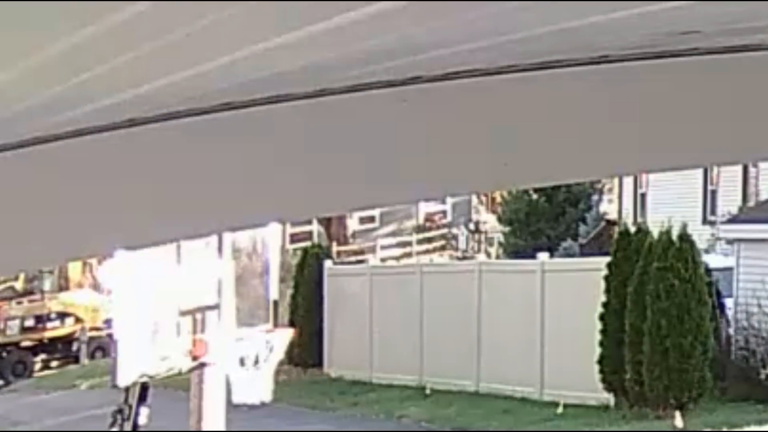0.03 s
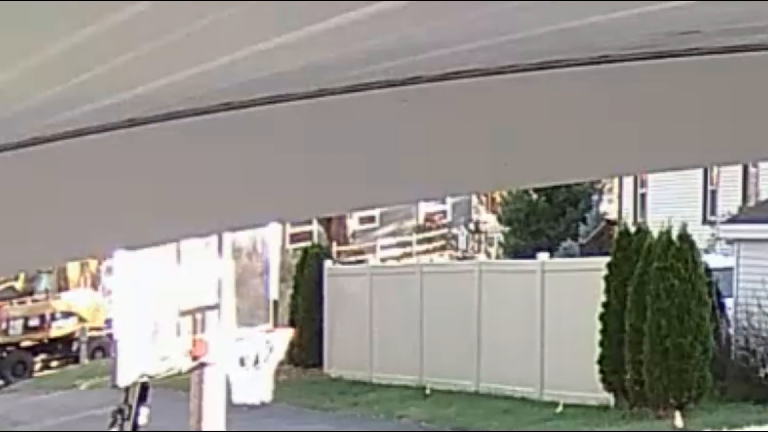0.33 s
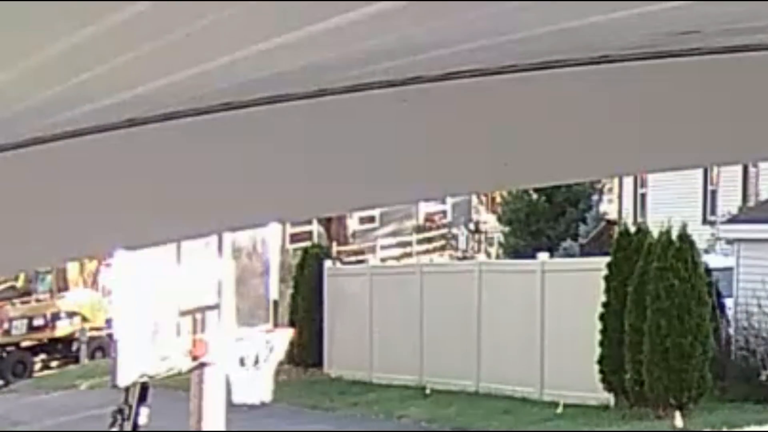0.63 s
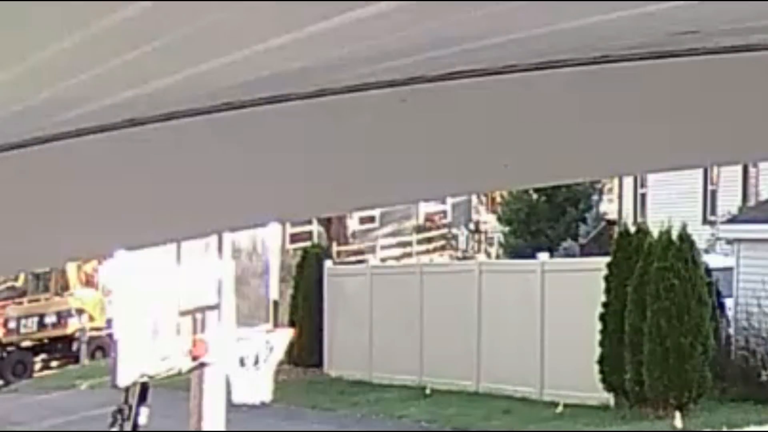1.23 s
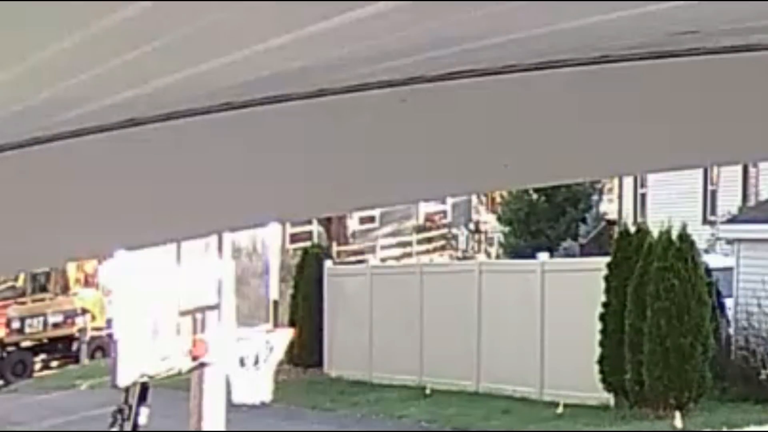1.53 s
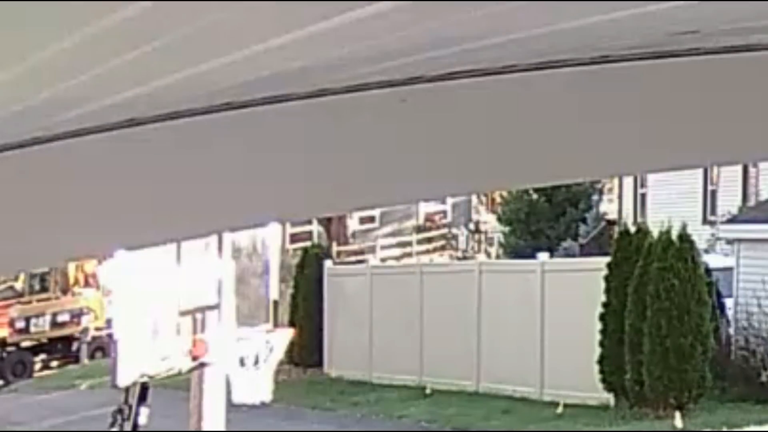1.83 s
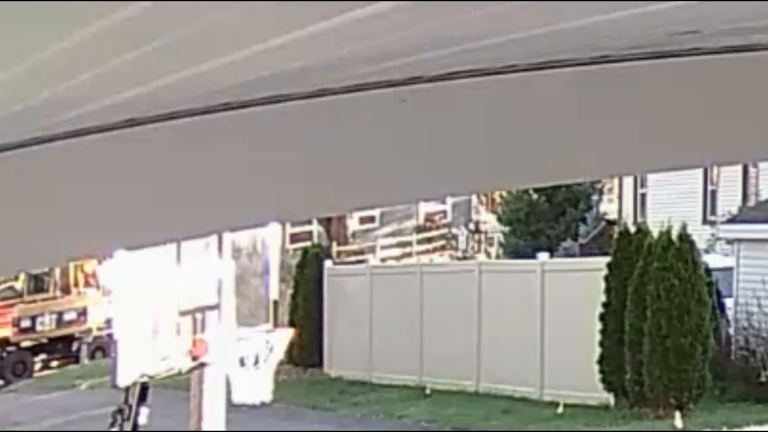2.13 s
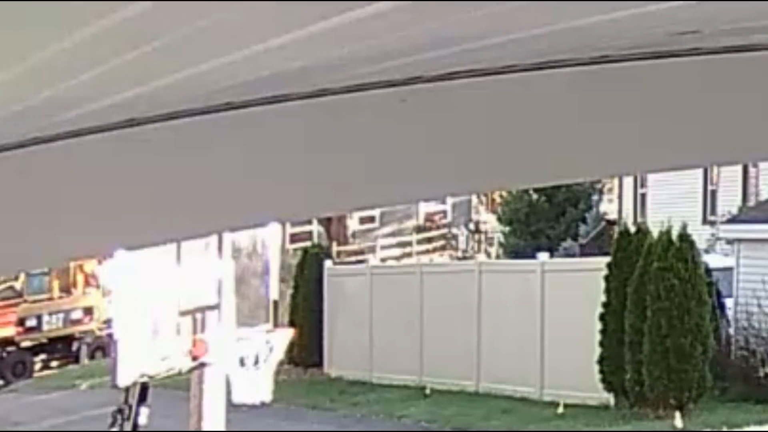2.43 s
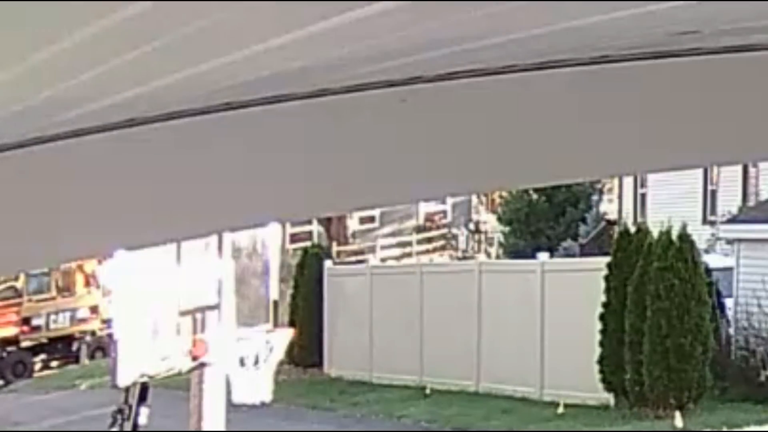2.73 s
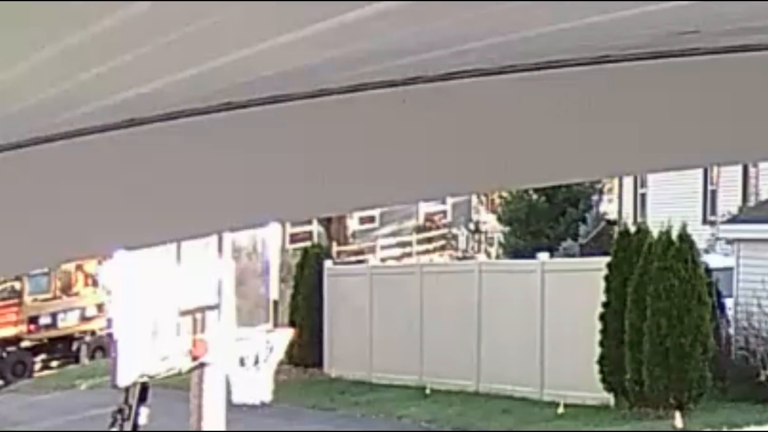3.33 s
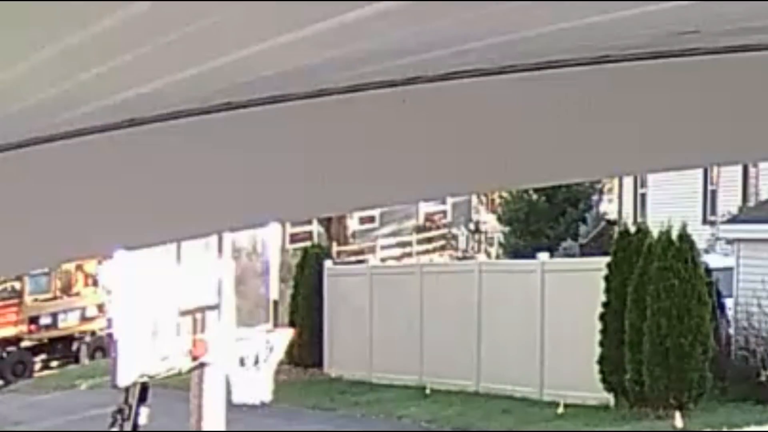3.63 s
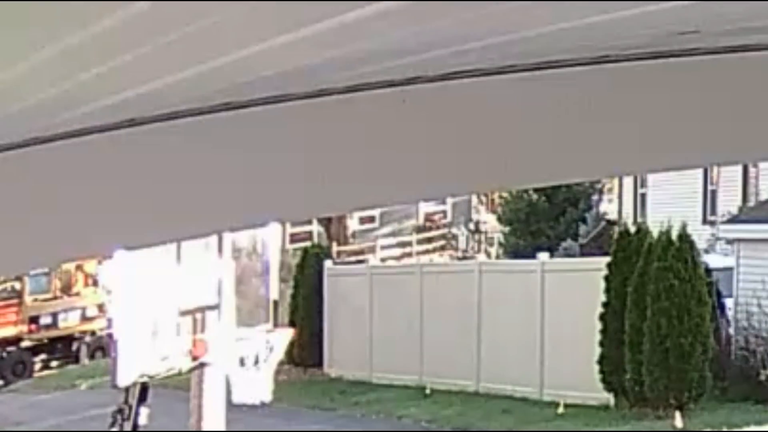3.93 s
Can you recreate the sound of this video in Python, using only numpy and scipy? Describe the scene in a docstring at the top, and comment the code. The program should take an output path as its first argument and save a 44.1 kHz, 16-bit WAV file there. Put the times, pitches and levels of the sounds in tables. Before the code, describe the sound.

Diesel machinery runs across the street for all 4 seconds, a deep throb with exhaust rumble and a steady roar. Faint gear tones come and go and a fan hum creeps upward. A thin high whine sinks from about 1 second and fades by 2.5. Near 2.9 seconds steel knocks and bounces in one clank. The camera microphone under the eaves sounds narrow and adds thin hiss.

```python
"""Under the eaves of a house, a narrow-band camera microphone hears diesel machinery across the street.
One engine idles with a deep throb; a second fires faster and beats against it, over exhaust rumble
and a steady mechanical roar. Gear tones come and go, a high whine sinks and a fan hum rises.
Steel knocks and bounces in one clank. The camera adds a thin hiss on top."""
import sys
import numpy as np
from scipy import signal
from scipy.fft import rfft, irfft
from scipy.io import wavfile
from scipy.ndimage import uniform_filter1d, map_coordinates

SR = 44100
rng = np.random.default_rng(int(sys.argv[2]) if len(sys.argv) > 2 else 0)


def materialize(psi):
    """Save the field psi as 16-bit PCM at rate SR to the path in sys.argv[1].

    A 1-D psi becomes a single channel; in a 2-D psi each row is a channel.
    """
    bounded = np.clip(np.atleast_2d(psi).T, -1, 1)
    quanta = np.round(bounded * 32767).astype(np.int16)
    wavfile.write(sys.argv[1], SR, quanta)


N = 176400

# spectrum of the machinery's roar and of the clank's crack (frequency [Hz], relative level [dB])
ROAR_SPECTRUM = [(200, -7.5), (500, -2), (750, 1.5), (1000, -1), (1300, -0.5), (1650, -0.5), (1980, -1),
                 (2150, -6), (2450, -8), (2750, -2), (3100, -0.5), (3280, -3), (3450, -9), (3750, -10.5),
                 (3920, -25.5), (4150, -33), (4500, -55), (5000, -66.5)]


def idling_engine(firing):
    """Slow, even firings: a deep throb with few overtones, each a little unsteady in level."""
    # exhaust harmonics (multiple of the firing rate, level [dB])
    orders = [(1, -22.5), (2, -32), (3, -43.5)]
    flutter_db = 0.7
    return np.sqrt(2) * sum(undb(db + flutter_db * walk(9.5)) * np.sin(k * firing) for k, db in orders)


def working_engine(firing):
    """An exhaust note fades under its octave and returns; unequal cylinders add wavering half orders."""
    # exhaust note (time [s], level [dB])
    note_level = [(0, -22.5), (.5, -28), (1.1, -25.5), (1.8, -29.5), (2.4, -30), (3, -36), (3.5, -29.5),
                  (4, -25.5)]
    # octave above it (time [s], level [dB])
    octave_level = [(0, -37), (1.5, -44), (2.25, -35), (2.7, -37), (3.2, -35.5), (4, -39.5)]
    # tones of the unequal cylinders (multiple of the firing rate, level [dB])
    half_orders = [(1.5, -41.5), (3.5, -42.5), (4.5, -45.5)]
    flutter_db, drone_hz, drone_db = 0.5, 174.3, -45.5
    out = undb(curve(note_level)) * np.sin(firing) + undb(curve(octave_level)) * np.sin(2 * firing)
    for k, db in half_orders:
        out += undb(db + flutter_db * walk(3.5)) * np.sin(k * firing + 2 * np.pi * rng.random())
    drone = undb(drone_db) * np.sin(turn(drone_hz))  # a steady machine tone beside the engine
    return np.sqrt(2) * (out + drone)


def exhaust_rumble(idle_firing, work_firing):
    """Turbulent exhaust gas, puffing with the firings of both engines."""
    # gas noise (frequency [Hz], relative level [dB])
    spectrum = [(5, 0.5), (14, 6.5), (24, 7.5), (45, 0), (78, 2), (110, 0.5), (140, 0.5), (190, -5.5),
                (245, -3.5), (320, -11.5), (450, -15.5), (700, -25), (1200, -58)]
    # its loudness (time [s], level [dB])
    level = [(0, -29), (.7, -30), (1.3, -29.5), (2.2, -29), (2.6, -28), (3, -27.5), (3.5, -27.5),
             (4, -32.5)]
    puffs = 1 + 0.19 * (np.cos(idle_firing) + np.cos(work_firing))
    return colour(noise() * puffs, spectrum) * undb(curve(level))


def roar(firing):
    """Combustion clatter and fan noise with a slight rattle, heard directly and off walls and eaves."""
    # roar straight across the street (time [s], level [dB])
    level = [(0, -36), (1.2, -36.5), (2.3, -36), (3.1, -35.5), (4, -37)]
    # reflections at the microphone (delay [s], gain [dB])
    reflections = [(0.0124, -16), (0.0206, -15.5), (0.034, -18.5)]
    rattle_hz, swell_db = 17.1, 0.54
    rattle = np.cos(turn(rattle_hz * (1 + .03 * walk(1.7))))
    pulsing = 1 + 0.047 * np.cos(firing) + 0.027 * rattle
    direct = colour(noise() * pulsing, ROAR_SPECTRUM) * undb(curve(level) + swell_db * walk(6.24))
    return direct + sum(undb(db) * np.roll(direct, int(delay * SR)) for delay, db in reflections)


def growl():
    """A low band of mechanical noise under the roar."""
    # machine noise (frequency [Hz], relative level [dB])
    spectrum = [(150, -22), (260, -2.5), (340, -1), (430, 3), (520, 1), (700, -11), (1200, -22.5),
                (3000, -52.5)]
    # its loudness (time [s], level [dB])
    level = [(0, -39.5), (.9, -40.5), (1.7, -38.5), (2.4, -43), (2.75, -38), (2.97, -38), (3.15, -39.5),
             (3.6, -39.5), (4, -37)]
    return colour(noise(), spectrum) * undb(curve(level))


def gear_whine(firing):
    """Gear tones locked to the working engine's speed; now one, now another swells up."""
    # gear tones (start [s], length [s], multiple of the firing rate, level [dB])
    swells = [(0, 0.69, 25, -45.5), (0.129, 0.38, 27, -46.5), (.47, .25, 27, -41.5), (.58, 0.19, 26, -49.5),
              (1.04, 0.4, 27, -47.5), (1.46, 0.99, 27, -46), (1.5, .42, 23, -49), (1.506, 0.25, 24, -48),
              (1.299, 0.58, 26, -52), (1.724, .36, 25, -47.5), (3.12, 0.44, 27, -47.5),
              (3.498, .42, 26, -46.5), (3.477, .36, 25, -45.5)]
    fade_s, flutter_db = .078, 1.5
    t, out = times(), np.zeros(N)
    for start, length, k, db in swells:
        fade = np.clip(np.minimum(t - start, start + length - t) / fade_s, 0, 1)
        out += np.sqrt(2) * fade * undb(db + flutter_db * walk(25)) * np.sin(k * firing)
    return out


def cooling_fan():
    """The hum of the blades creeps up as the fan gathers speed."""
    # blade tone (time [s], blade rate [Hz], level [dB])
    hum = [(0, 182, -50.5), (.65, 185, -37.5), (1.25, 187.5, -39.5), (2, 193, -44), (2.6, 195.5, -42.5),
           (3, 199, -43), (3.35, 200, -37.5), (4, 200, -48)]
    return glide(hum)


def turbo_whine():
    """A thin, fluttering whine, probably the turbocharger, lifts slightly and then runs down."""
    # rotor tone (time [s], pitch [Hz], level [dB])
    whine = [(0, 1912, -48), (.2, 1918, -42), (.35, 1928, -53.5), (.75, 1950, -43.5), (1, 1941, -44.5),
             (1.12, 1930, -51), (1.32, 1885, -46), (1.5, 1872, -55.5), (1.88, 1830, -51), (2.07, 1820, -44),
             (2.25, 1814, -51.5), (2.6, 1804, -67.5)]
    return glide(whine, waver=.0015 * walk(70)) * undb(walk(25))


def clank():
    """Steel knocks and bounces in one clank, cracking and ringing, and the heavy body thumps twice."""
    # sharp onsets (time [s], gain [dB], brightness [dB/octave])
    # the first and last rows are two faint, bright ticks; the rows between make the clank
    onsets = [(1.975, -13, 3), (2.867, 0, -3.5), (2.8703, -3, 5.5), (2.881, -1, -3.5), (2.886, -7, 1),
              (2.903, -9.5, 0), (2.919, -13.5, 5), (3.303, -11.5, 4)]
    # ringing after each onset (frequency [Hz], relative level [dB], t60 [s])
    high_modes = [(1195, -34.5, 0.079), (1301, -35, 0.074), (1330, -34, .05), (1560, -36.5, .05),
                  (1630, -36, 0.057), (2363, -38.5, 0.1), (2780, -33.5, 0.033), (3080, -29, .035),
                  (3240, -28.5, .04), (3710, -34, 0.026)]
    # thumps of the body (time [s], gain [dB])
    thumps = [(2.873, -25.5), (2.89, -23.5)]
    # ringing of the body (frequency [Hz], relative level [dB], t60 [s])
    body_modes = [(140, -8, 0.19), (228, 1, 0.18), (258, -6, 0.14), (290.5, -3, 0.15), (337, -7.5, 0.091)]
    attack_s, crack_decay_s, thump_rise_s = 0.00048, 0.0087, 0.0047
    t, out = times(), np.zeros(N)
    for start, db, brightness in onsets:
        age = np.maximum(t - start, 0)
        crack = undb(-32.5) * np.exp(-age / crack_decay_s) * colour(noise(), ROAR_SPECTRUM)
        out += undb(db) * (1 - np.exp(-age / attack_s)) * (ring(high_modes, age, brightness) + crack)
    for start, db in thumps:
        age = np.maximum(t - start, 0)
        out += undb(db) * (1 - np.exp(-age / thump_rise_s)) * ring(body_modes, age)
    return out


def steel_whir():
    """Shaken steel parts ring faintly in narrow bands that swell and fade."""
    # resonances of the parts (frequency [Hz], width [Hz], level [dB])
    bands = [(1185, 34, -61.5), (1307, 48, -56.5), (1595, 17, -58), (1970, 53, -51.5), (2138, 13, -59),
             (3000, 42, -55.5), (3103, 50, -53.5), (3214, 22, -53.5)]
    flutter_db = 2
    return sum(undb(db + flutter_db * walk(6.8)) * resonance(hz, width) for hz, width, db in bands)


def ring(modes, age, tilt_db=0, pivot_hz=2000):
    """Decaying modes, tilted brighter or duller in dB per octave."""
    out = np.zeros(N)
    for hz, db, t60 in modes:
        envelope = undb(db + tilt_db * np.log2(hz / pivot_hz) - 60 * age / t60)
        out += envelope * np.sin(2 * np.pi * (hz * age + rng.random()))
    return np.sqrt(2) * out


def glide(rows, waver=0):
    """A tone along (time [s], pitch [Hz], level [dB]) rows, its pitch wavering by the given share."""
    rows = np.array(rows)
    hz, db = curve(rows[:, :2]), curve(rows[:, ::2])
    return np.sqrt(2) * undb(db) * np.sin(turn(hz * (1 + waver)))


def resonance(hz, width):
    """Noise ringing in one resonance; rms 1."""
    f = np.fft.rfftfreq(N, 1 / SR)
    return unit(irfft(rfft(noise()) / (1 + (2 * (f - hz) / width) ** 2), N))


def colour(x, spectrum):
    """Filter by (frequency [Hz], relative level [dB]) rows; rms 1."""
    hz, db = np.array(spectrum).T
    f = np.maximum(np.fft.rfftfreq(N, 1 / SR), 1)
    gain = undb(np.interp(np.log(f), np.log(hz), db))
    return unit(irfft(rfft(x) * gain, N))


def walk(rate_hz):
    """Smooth random drift; rms 1."""
    step = int(SR / rate_hz)
    held = np.repeat(rng.standard_normal(400), step)[:N + 2 * step]
    smooth = uniform_filter1d(uniform_filter1d(held, step), step)
    return unit(np.resize(smooth[step:], N))


def turn(hz):
    """Running phase in radians of a rate, from a random start."""
    return 2 * np.pi * (np.cumsum(hz * np.ones(N)) / SR + rng.random())


def curve(rows):
    """Straight lines through (time [s], value) rows."""
    return np.interp(times(), *np.array(rows).T)


def times():
    """Seconds at each sample."""
    return np.arange(N) / SR


def noise():
    """White noise."""
    return rng.standard_normal(N)


def undb(db):
    """Decibels to gain."""
    return 10 ** (np.asarray(db) / 20)


def unit(x):
    """Scale to rms 1."""
    return x / np.sqrt(np.mean(x ** 2))


def scene():
    """The machinery as heard from across the street, in mono; two firing phases drive the engines."""
    # speed of the working engine (time [s], firing rate [Hz])
    work_speed = [(0, 61.3), (.25, 61.55), (.6, 62.0), (1, 62.6), (1.28, 62.95), (1.6, 62.3), (1.95, 62.75),
                  (2.25, 63.15), (2.7, 63.3), (3.3, 62.75), (3.6, 61.9), (4, 62.2)]
    idle_hz = 35.1
    idle_firing = turn(idle_hz * (1 + 0.0038 * walk(2.8)))
    work_firing = turn(curve(work_speed))
    engines = idling_engine(idle_firing) + working_engine(work_firing)
    din = exhaust_rumble(idle_firing, work_firing) + roar(work_firing) + growl()
    whines = gear_whine(work_firing) + turbo_whine() + cooling_fan()
    return (engines + din + whines + steel_whir() + clank())[None]


def record(dry):
    """The camera joins narrow-band, low-rate samples by straight lines, mirroring the sound into the treble,
    and adds a faint hiss."""
    mic_top_hz, camera_rate_hz, output_top_hz, self_noise_db = 4150, 16000, 15800, -88.5
    mic_lowpass = signal.ellip(8, .2, 70, mic_top_hz, fs=SR, output="sos")
    output_lowpass = signal.ellip(8, .2, 70, output_top_hz, fs=SR, output="sos")
    narrow = signal.sosfilt(mic_lowpass, np.pad(dry[0], (0, 64), mode="edge"))
    positions = np.arange(0, len(narrow), SR / camera_rate_hz)
    samples = map_coordinates(narrow, [positions], order=5, mode="nearest")
    joined = np.interp(np.arange(N), positions, samples)
    return signal.sosfilt(output_lowpass, joined + undb(self_noise_db) * noise())[None]


dry = scene()
out = record(dry)
materialize(out)
```